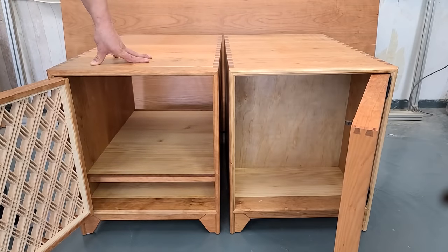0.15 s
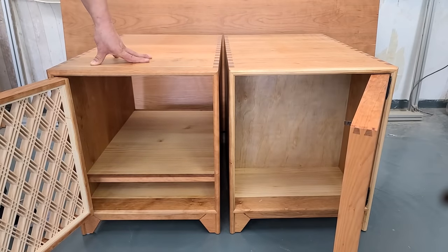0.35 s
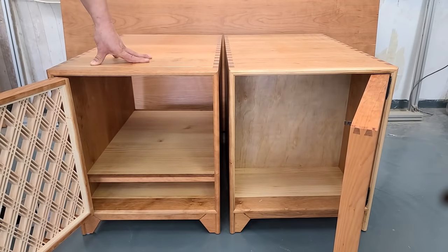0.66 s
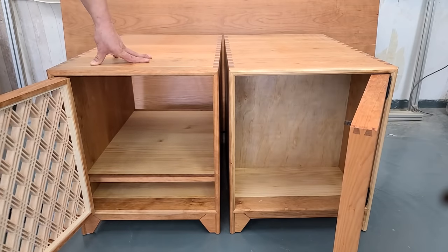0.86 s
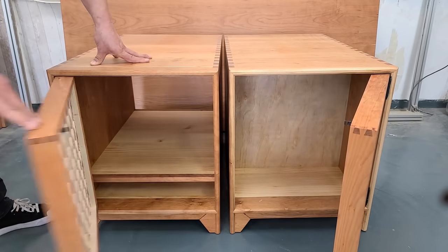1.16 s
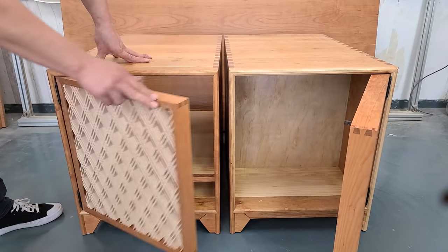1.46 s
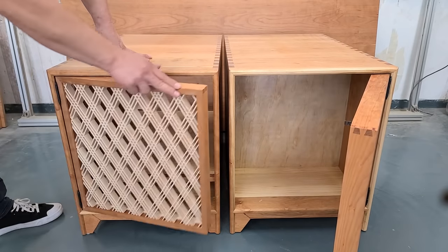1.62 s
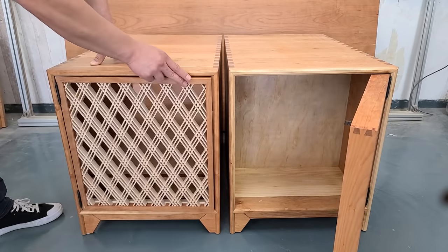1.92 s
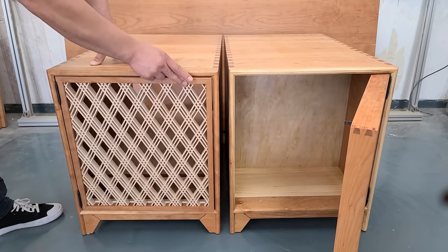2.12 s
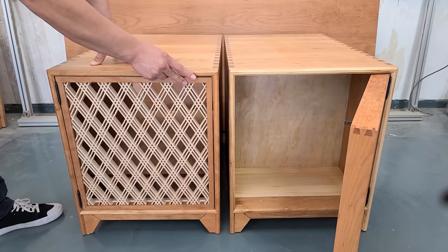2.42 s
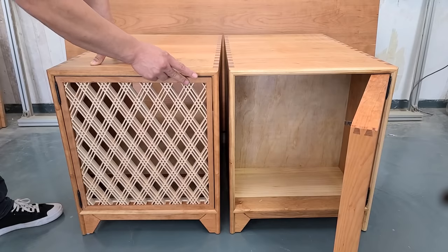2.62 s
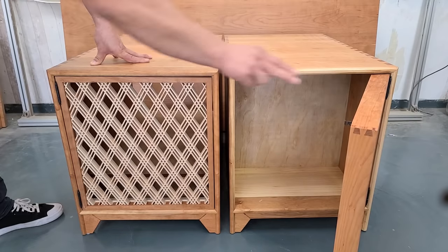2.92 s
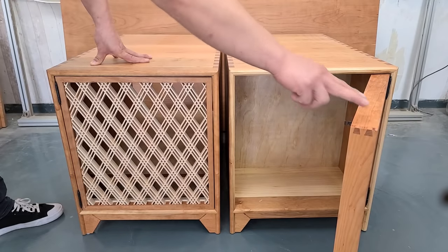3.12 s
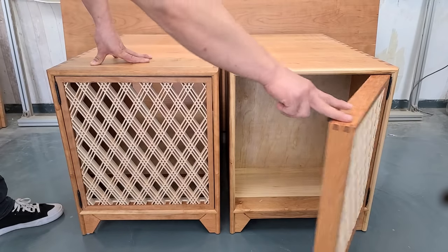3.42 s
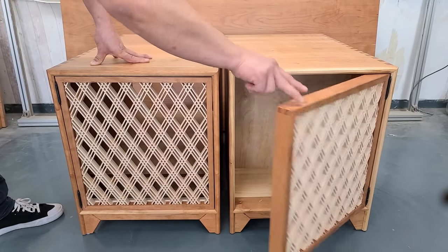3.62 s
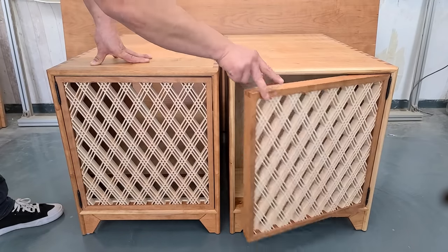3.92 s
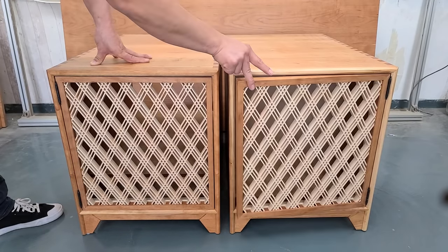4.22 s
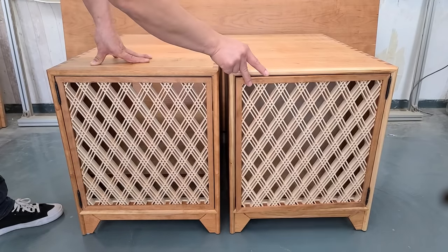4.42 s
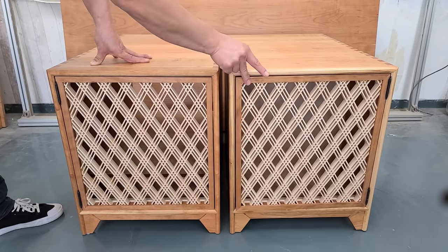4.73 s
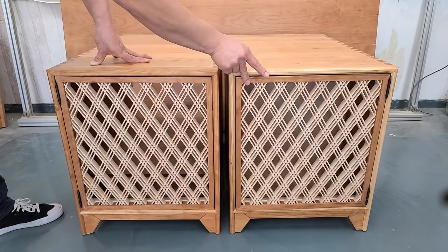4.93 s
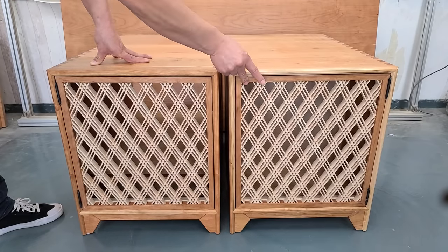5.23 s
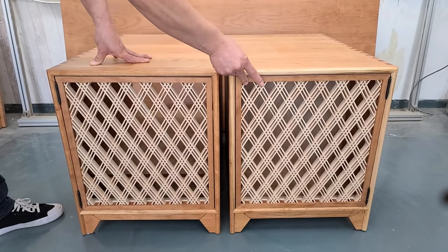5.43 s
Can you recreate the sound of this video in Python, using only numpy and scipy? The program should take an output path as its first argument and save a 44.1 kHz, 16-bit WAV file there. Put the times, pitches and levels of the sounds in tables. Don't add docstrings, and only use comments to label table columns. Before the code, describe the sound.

Dry hinge squeaks, then a wooden cabinet door claps shut loudly; a second door knocks lightly and is nudged closed in a rumbling workshop.

```python
import sys
import numpy as np
from scipy import signal
from scipy.fft import rfft, irfft, next_fast_len
from scipy.io import wavfile
from scipy.ndimage import uniform_filter1d

SR = 44100
rng = np.random.default_rng(int(sys.argv[2]) if len(sys.argv) > 2 else 0)


def transcribe(signal):
    frames = np.atleast_2d(signal).T
    limited = np.clip(frames, -1, 1)
    pcm = np.round(limited * 32767).astype(np.int16)
    wavfile.write(sys.argv[1], SR, pcm)


def linear_from_db(decibels):
    return 10 ** (np.asarray(decibels, float) / 20)


N = 245372
T = np.arange(N) / SR

# frequency in Hz, likeness from 0 to 1.
LIKENESS = [(60, .99), (150, 0.92), (300, .8), (600, 0), (1500, 0), (8000, 0.01)]
# frequency in Hz, level in dB per Hz.
AIR_TONE = [(12, -42), (20, -12.5), (40, -18), (55, -1.5), (75, -4), (92, -6.5), (109, -17.5), (238, -24),
            (352, -22.5), (439, -28), (932, -31), (2540, -46), (7000, -59.5), (14800, -60.5),
            (15500, -69.5)]
# centre in Hz, width in Hz, level in dB.
DUCT_BANDS = [(54, 16, -55.5), (88.5, 19, -68.5), (8340, 700, -86), (12800, 90, -95.5), (13550, 120, -95)]
# frequency in Hz, level in dB.
MOTOR_HUM = [(28, -56), (242, -73.5), (350, -79), (480, -67.5)]
# frequency in Hz, time to fall by 60 dB in seconds.
ROOM_T60 = [(60, .5), (200, 0.62), (1000, 0.6), (3000, 0.6), (6000, 0.54), (10000, 0.42), (16000, 0.28)]
# frequency in Hz, level in dB.
ROOM_TONE = [(60, -20.5), (250, -1), (1000, 1.5), (4000, -2), (12000, -3.5)]
# start in seconds, hold in seconds, frequency in Hz, level in dB.
FLOOR_SHAKES = [
    (2.161, .15, 90.5, -40.5),
    (2.69, .5, 93.2, -44.5),
    (3.929, 0.038, 78.7, -40),
]
# start, rise, hold and fall in seconds, level in dB.
SWING = (0.38, -2.9, 3, -0.45, -62.5)
# start, rise, hold and fall in seconds, level in dB.
RUB_STROKES = [
    (2.98, 0.13, 0.092, 0.19, -70),
    (3.02, .1, 0.6, 0.037, -68),
    (5.25, 0.48, .1, .03, -64.5),
]
# frequency in Hz, level in dB.
RUB_TONE = [(700, 10.5), (1500, 5.5), (3000, -2.5), (5000, -5), (6500, -13), (9800, -12), (10550, -1.5),
            (11200, -12), (15000, -15)]

# time in seconds, slip rate in Hz, level in dB.
UPPER_HINGE = [(1.38, 654, -70), (1.455, 663, -68), (1.53, 673, -65), (1.6, 668, -68), (1.68, 667, -71),
               (1.73, 655, -84)]
LOWER_HINGE = [(1.53, 661, -68), (1.6, 645, -63.5), (1.67, 609.4, -59.5), (1.8, 588, -64.5),
               (1.915, 570.2, -63.5), (1.945, 529.5, -73.5), (2.07, 497, -76)]
# frequency in Hz, level in dB.
UPPER_TONE = [(600, -15), (1300, -1), (2000, 8), (2650, 2), (3350, 5), (4000, -14), (4700, -36),
              (5500, -40), (6150, -12), (6700, -42)]
LOWER_TONE = [(560, 5.5), (640, -28), (1020, 2.5), (1140, 8), (1230, -8.5), (1550, -5), (1850, 4.5),
              (2450, -28.5), (3050, -3), (3300, 9.5), (3700, -51), (5600, -45), (6200, -27), (6700, -40)]

# time in seconds, crack level in dB, body level in dB, push length in ms,
# brightness in dB per octave.
TOUCH = [
    (2.048, -45, -39.5, 7.7, 0.5),
    (2.057, -41, -33.5, 1.75, -2.5),
    (2.109, -47, -32.5, 1.9, 3),
    (2.163, -54, -33.5, 2.9, -3.5),
]
PRESS = [
    (2.395, -57.5, -53.5, 0.2, -1),
    (2.415, -62, -62, 0.21, -1),
    (2.44, -66, -67.5, .25, -1),
]
CLAP = [
    (2.484, -56, -51, 0.79, 6),
    (2.4915, -21.5, -15.5, 3.7, 10),
    (2.498, -17.5, -30.5, 3.3, -5),
    (2.504, -19.5, -31, 0.85, 0),
    (2.508, -19.5, -24, 0.38, 2),
    (2.511, -8.5, -15.5, 0.67, -3),
]
INNER_BLOW = (2.5, -28.5, -15.5, 0.6, 3.5)
KNOCK = [
    (3.7245, -36.5, -36, 1.5, 7.5),
    (3.7305, -29, -22, 2.46, 1.3),
    (3.745, -32.5, -22, 2.2, 2),
    (3.948, -69, -30, 4.7, -2),
]
NUDGE = [
    (4.609, -47, -42.5, 2.8, 1.5),
    (4.666, -49, -45.5, 2.34, 0.46),
    (4.70, -62, -40, 4.5, -1),
]
SHUT = [
    (5.06, -57, -44, 4.6, 0.71),
    (5.084, -48, -43, 1.2, 1.85),
    (5.092, -51, -30.5, 2.3, .1),
    (5.097, -49.5, -22.5, 2.75, 0.36),
    (5.11, -52, -28, 1.45, -0.23),
    (5.362, -55, -55.5, 5.5, -2),
]

# frequency in Hz, level in dB, time to fall by 60 dB in seconds.
TOUCH_MODES = [(133.22, -5, 0.41), (192, -3, 0.24), (220.5, -9.5, 0.068), (300, -8.5, 0.097),
               (386.6, -4.5, 0.2), (560, -19.5, .12), (1000, -5.5, 0.055), (1630, -10, .05),
               (1759, -3, 0.075), (4050, 2.5, .009)]
PRESS_MODES = [(670, -9, 0.073), (1047, -8.5, 0.051), (1642, 0, .04), (3450, 2, .05), (3900, -2.5, .03)]
CLAP_MODES = [(89, -34.5, .15), (125, -10.5, 0.25), (172, -24.5, 0.033), (224, -18.5, .15),
              (284.2, -11.5, 0.11), (300, -14.5, 0.06), (363.2, -5.5, 0.27), (427.8, -4, 0.13),
              (543, -3, 0.062), (617, -10, 0.035), (723, -7, 0.077), (796, -3.5, 0.16), (879, -7.5, .07),
              (923, -10, 0.048), (1133, -3, .07), (1188, -1, .06), (1260, -4.5, 0.14), (1715, -8, .05),
              (2420, -14, .04)]
KNOCK_MODES = [(74.6, -12.5, 0.21), (113.6, -8, 0.26), (181, -7, 0.071), (232, -2.5, 0.044),
               (370, -19.5, 0.16), (442, -0.5, 0.034), (555, -6, 0.14), (707, -0.5, 0.082), (1053, 1, .07),
               (1530, -18, .06)]
NUDGE_MODES = [(158.7, -2, 0.13), (212, 1.5, 0.13), (386, 1, 0.15), (1090, -14, .06), (1350, -21, .06),
               (2800, -22, .04), (4400, -18, .04)]
SHUT_MODES = [(163.6, -20, 0.062), (191.5, -12, 0.18), (215.8, -1.5, .21), (259.3, -10.5, 0.11),
              (343, -18.5, 0.13), (398, -21, 0.16), (1361, -36, .05), (2900, -21, .04), (3677, -20, .05),
              (5500, -34, .03)]

# frequency in Hz, level in dB per Hz.
TOUCH_CRACK = [(500, -3), (1000, -2.5), (1350, -9.5), (1700, -2), (2400, -10), (3300, -5), (4100, -4.5),
               (5000, -16.5), (6600, -21), (10000, -23.5), (16000, -32.5)]
CLAP_CRACK = [(150, -17), (500, -6), (1300, -1), (1900, -6.5), (2800, -6), (4500, -14.5), (6500, -24),
              (9000, -26), (16000, -44)]
KNOCK_CRACK = [(180, -39.5), (300, -16), (447, 7.5), (713, -1.5), (1080, 1), (1810, -8.5), (5430, -37.5),
               (13800, -72), (16000, -82)]
NUDGE_CRACK = [(500, 1), (1200, -0.5), (2200, -9), (2900, -12.5), (4400, -11), (5500, -29), (7000, -41.5),
               (12000, -48.5)]
SHUT_CRACK = [(500, -5.5), (1400, -8), (2300, -17), (2900, -14), (3700, -20), (5500, -24.5), (7000, -33),
              (8800, -25), (11000, -34), (16000, -37)]


def unit(x):
    return x / np.sqrt(np.mean(x ** 2))


def at(table, hz):
    table = np.array(table)
    return np.interp(np.log(hz + 1e-9), np.log(table[:, 0]), table[:, 1])


def colour(x, gain):
    size = next_fast_len(x.shape[-1])
    spectrum = rfft(x, size) * gain(np.fft.rfftfreq(size, 1 / SR))
    return irfft(spectrum, size)[..., :x.shape[-1]]


def pair(size):
    def like(hz):
        return np.clip(at(LIKENESS, hz), 0, 1)

    mid, side = rng.standard_normal((2, size))
    mid = colour(mid, lambda hz: np.sqrt(1 + like(hz)))
    side = colour(side, lambda hz: np.sqrt(1 - like(hz)))
    return np.array([mid + side, mid - side]) / np.sqrt(2)


def walk(rate):
    k = int(SR / rate)
    held = rng.standard_normal(N // 256)[np.arange(N) // k]
    return unit(uniform_filter1d(uniform_filter1d(held, k), k))


def swell(start_s, rise_s, hold_s, fall_s):
    end_s = start_s + rise_s + hold_s + fall_s
    ramp = np.minimum((T - start_s) / rise_s, (end_s - T) / fall_s)
    return np.sin(np.pi / 2 * np.clip(ramp, 0, 1)) ** 2


def track(table):
    s, *columns = np.transpose(table)
    fade_s = 0.04
    gate = np.clip(np.minimum(T - s[0], s[-1] - T) / fade_s, 0, 1)
    return [np.interp(T, s, c) for c in columns] + [gate]


def air():
    rumble = unit(colour(pair(N), lambda hz: linear_from_db(at(AIR_TONE, hz)) * (hz > 16)))
    out = rumble * linear_from_db(-50.5 + 0.42 * walk(1.8))
    for centre, width, db in DUCT_BANDS:
        out += unit(colour(pair(N), lambda hz: np.exp(-((hz - centre) / width) ** 2))) * linear_from_db(db)
    for hz, db in MOTOR_HUM:
        phase = 2 * np.pi * np.cumsum(hz + 1.2 * walk(6)) / SR
        out += np.sqrt(2) * np.sin(phase) * linear_from_db(db + 1.2 * walk(8))
    return out


def room(x):
    level_db, rise_ms = -2, 4.5
    t = T[:SR]
    noise, echoes = pair(SR), 0
    for centre in 45 * 2 ** np.arange(0, 9, .5):
        band = colour(noise, lambda hz: np.clip(1 - 2 * np.abs(np.log2((hz + 1e-9) / centre)), 0, 1))
        echoes = echoes + band * linear_from_db(at(ROOM_TONE, centre) - 60 * t / at(ROOM_T60, centre))
    echoes *= 1 - np.exp(-1000 * t / rise_ms)
    echoes *= linear_from_db(level_db) / np.sqrt(SR / 30)
    return signal.fftconvolve(x[None], echoes, axes=1)[:, :N]


def boom():
    rise_s, fall_s, sag_db_per_s = 0.017, 0.085, 17.5
    out = np.zeros(N)
    for s, hold_s, hz, db in FLOOR_SHAKES:
        shake = np.sqrt(2) * np.sin(2 * np.pi * hz * (T - s))
        sagging = linear_from_db(db - sag_db_per_s * np.maximum(T - s, 0))
        out += shake * swell(s, rise_s, hold_s, fall_s) * sagging
    return out


def swing():
    *shape, db = SWING
    centre_hz, width_hz = 178, 22
    breath = unit(colour(pair(N), lambda hz: np.exp(-((hz - centre_hz) / width_hz) ** 2)))
    return breath * linear_from_db(db) * swell(*shape)


def rub():
    stroke = sum(linear_from_db(db) * swell(*shape) for *shape, db in RUB_STROKES)
    hiss = unit(colour(pair(N), lambda hz: linear_from_db(at(RUB_TONE, hz)) * (hz > 600)))
    return hiss * stroke * linear_from_db(2.0 * walk(20))


def hinge(table, tone, wobble, flutter_db, bright_hz, dull_db_per_hz):
    span = slice(int(table[0][0] * SR), int(table[-1][0] * SR))
    hz, db, gate = (c[span] for c in track(table))
    bright_db = dull_db_per_hz * np.minimum(hz - bright_hz, 0)
    phase = 2 * np.pi * np.cumsum(hz * (1 + wobble * walk(110)[span])) / SR
    out = np.zeros(N)
    for k in range(1, 11):
        partial_db = at(tone, k * hz) + db
        partial_db += bright_db * np.log2(max(k / 4, 1)) * 2
        partial_db += flutter_db * walk(45)[span]
        out[span] += linear_from_db(partial_db) * np.sin(k * phase) * gate
    return out


def rebounds(count):
    first_s, gap_s = CLAP[-1][0] + .0093, .0123
    push_ms, bright_db = 1.33, -8.5
    return [(first_s + k * gap_s, -24.5 - k * 5, -16 + k * 0.4, push_ms, bright_db) for k in range(count)]


def blows(table, modes, crack_tone, crack_ms, pan_db, wet_db, cut_hz, rise_ms=0.39, tick_db=-40, sign=1):
    out, t = np.zeros((3, N + SR)), T[:SR // 2]
    hz, db, t60 = (c[:, None] for c in np.transpose(modes))
    ring = -np.sin(2 * np.pi * hz * t) * np.exp(-np.log(1000) * t / t60) * linear_from_db(db)
    for s, crack_db, body_db, push_ms, bright_db in table:
        def tone(f):
            tilt_db = bright_db * np.log2(f / 2000 + 1e-9)
            return linear_from_db(at(crack_tone, f) + tilt_db) * (f > crack_tone[0][0])

        chance = rng.standard_normal(len(modes))
        grit = unit(colour(pair(len(t)), tone))
        crack = linear_from_db(crack_db) * grit * np.exp(-1000 * t / crack_ms) * np.minimum(1000 * t / rise_ms, 1)
        snap = unit(colour(signal.unit_impulse(len(t), 200), tone)) * np.sqrt(np.mean(crack ** 2))
        push = np.sin(np.pi * np.clip(1000 * t[:400] / push_ms, 0, 1))
        push[0] = push.sum() * linear_from_db(tick_db + crack_db - body_db)
        strike = sign * linear_from_db(body_db + 2 * chance)
        body = signal.fftconvolve(strike @ ring, push / push.sum())[:len(t)]
        late = np.r_[np.zeros(7), body[:-7]]
        k = int(s * SR)
        out[:, k:k + len(t)] += [crack[0] + body, crack[1] + late, snap + body]
    out = signal.sosfilt(signal.butter(3, cut_hz, "high", fs=SR, output="sos"), out)
    return out[:, :N] * linear_from_db([[pan_db / 2], [-pan_db / 2], [wet_db]])


def scene():
    squeak = hinge(UPPER_HINGE, UPPER_TONE, wobble=0.014, flutter_db=5.5, bright_hz=666, dull_db_per_hz=4.5)
    squeak += hinge(LOWER_HINGE, LOWER_TONE, wobble=.016, flutter_db=4, bright_hz=586, dull_db_per_hz=3.2)
    doors = squeak * linear_from_db([[0.5], [-2.5], [0.5]])
    doors += blows(TOUCH, TOUCH_MODES, TOUCH_CRACK, crack_ms=10, pan_db=1.1, wet_db=-1.0, cut_hz=75,
                   tick_db=-3)
    doors += blows(PRESS, PRESS_MODES, TOUCH_CRACK, crack_ms=19, pan_db=2.0, wet_db=5.5, cut_hz=300,
                   rise_ms=12)
    claps = list(CLAP) + rebounds(count=4) + [INNER_BLOW]
    doors += blows(claps, CLAP_MODES, CLAP_CRACK, crack_ms=8.24, pan_db=0.6, wet_db=0.5, cut_hz=131)
    doors += blows(KNOCK, KNOCK_MODES, KNOCK_CRACK, crack_ms=7.0, pan_db=1.0, wet_db=-2.6, cut_hz=42,
                   tick_db=-9, sign=-1.04)
    doors += blows(NUDGE, NUDGE_MODES, NUDGE_CRACK, crack_ms=8.1, pan_db=0.0, wet_db=0.5, cut_hz=86)
    doors += blows(SHUT, SHUT_MODES, SHUT_CRACK, crack_ms=9.7, pan_db=0.0, wet_db=-1.5, cut_hz=83,
                   rise_ms=4.2, tick_db=0)
    return doors[:2] + room(doors[2]) + rub() + boom() + swing() + air()


def roll_off(x):
    return signal.sosfilt(signal.butter(12, 16450, fs=SR, output="sos"), x)


def record(dry):
    held = 1.6 * np.tanh(dry / 1.6)
    top_cut = signal.ellip(8, .2, 70, 15650, fs=SR, output="sos")
    mix = signal.sosfilt(top_cut, held)
    return roll_off(mix)


dry = scene()
out = record(dry)
transcribe(out)
```